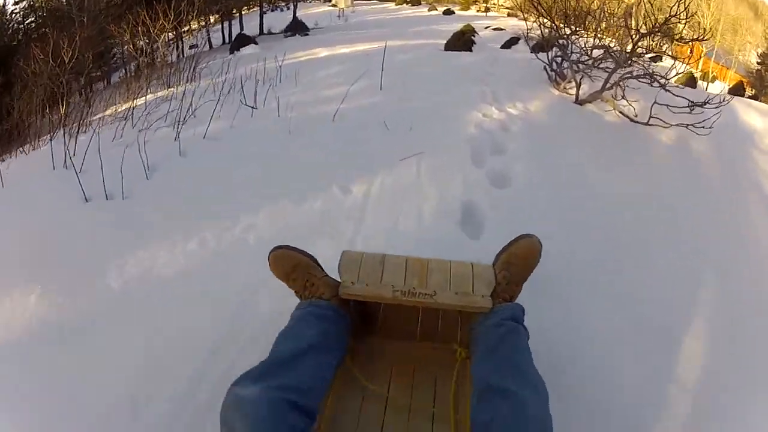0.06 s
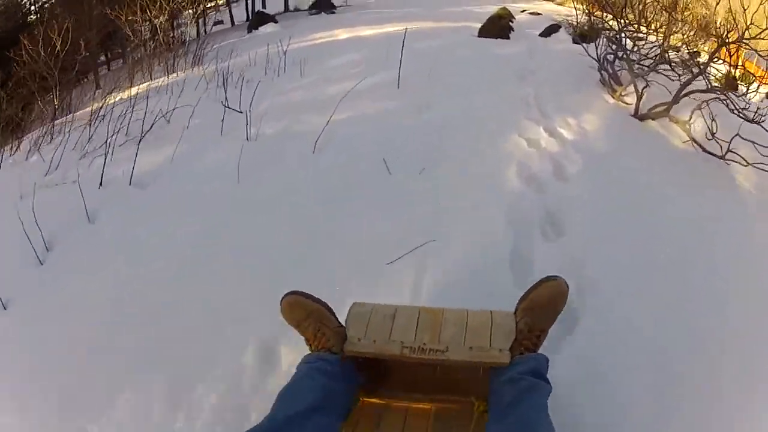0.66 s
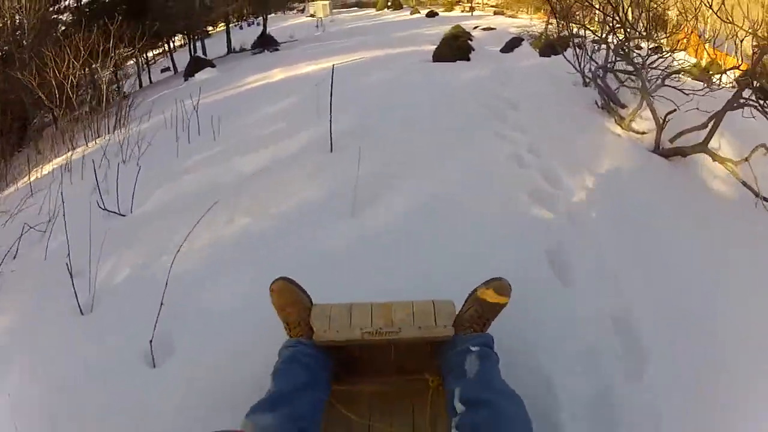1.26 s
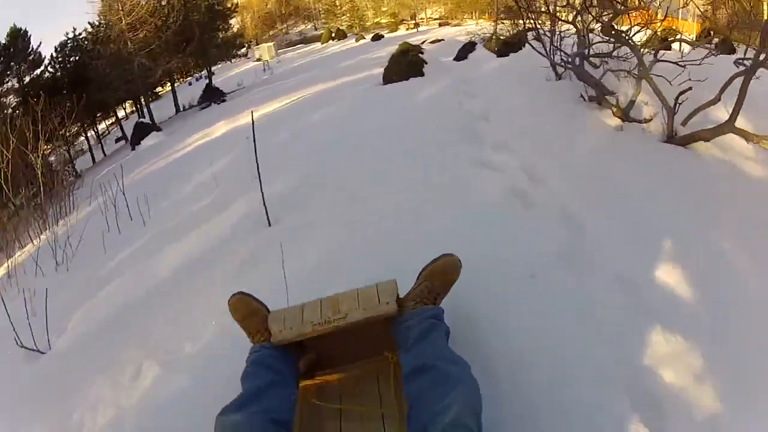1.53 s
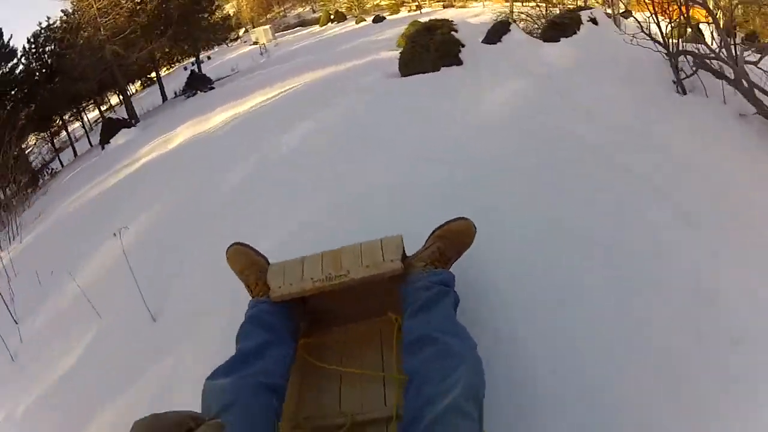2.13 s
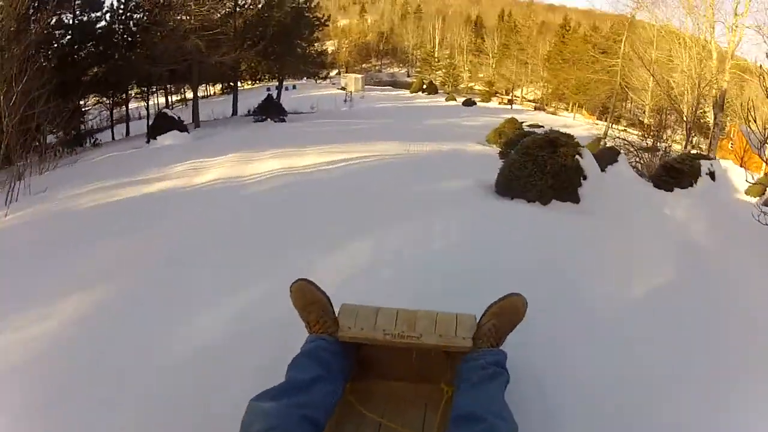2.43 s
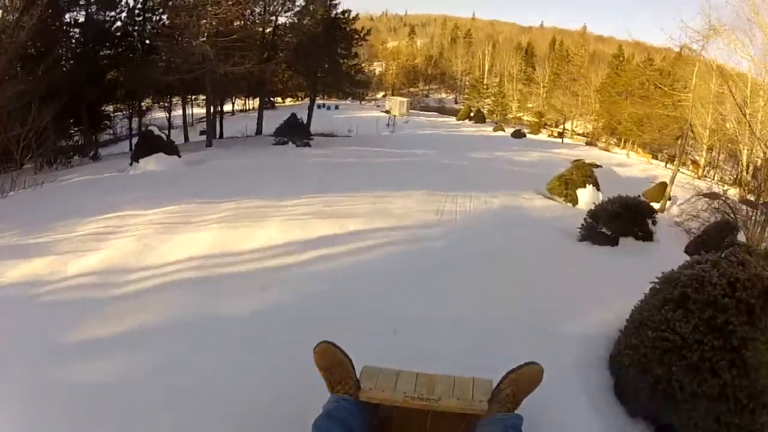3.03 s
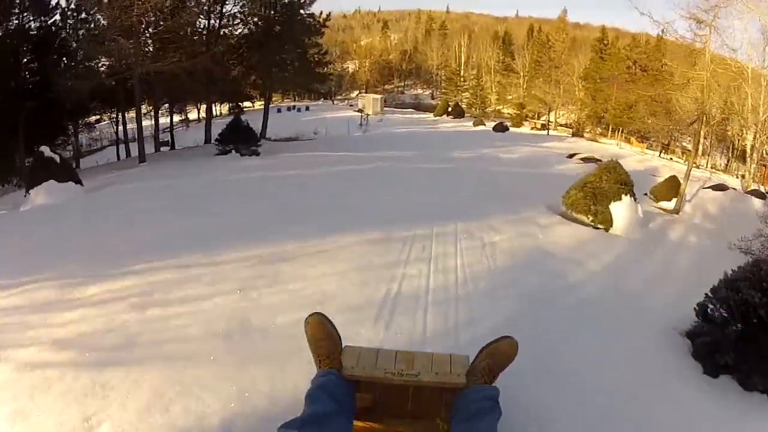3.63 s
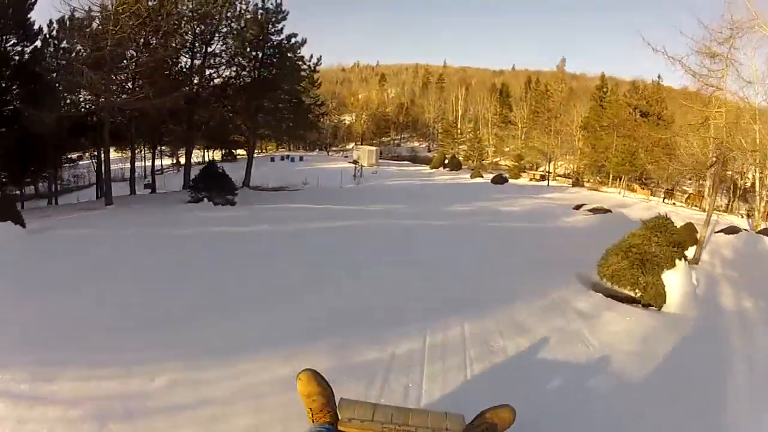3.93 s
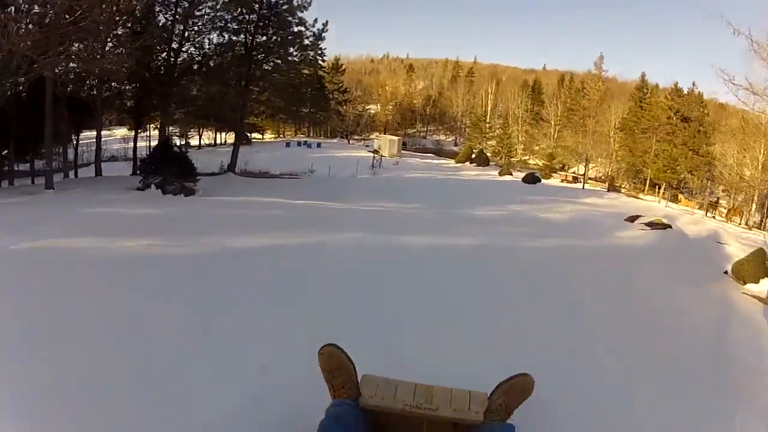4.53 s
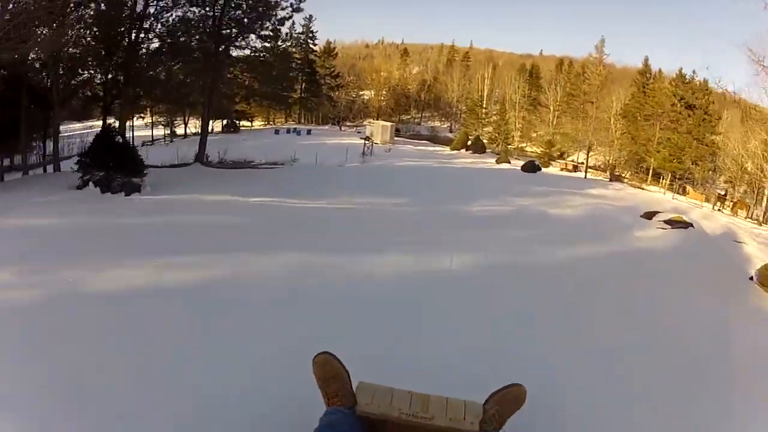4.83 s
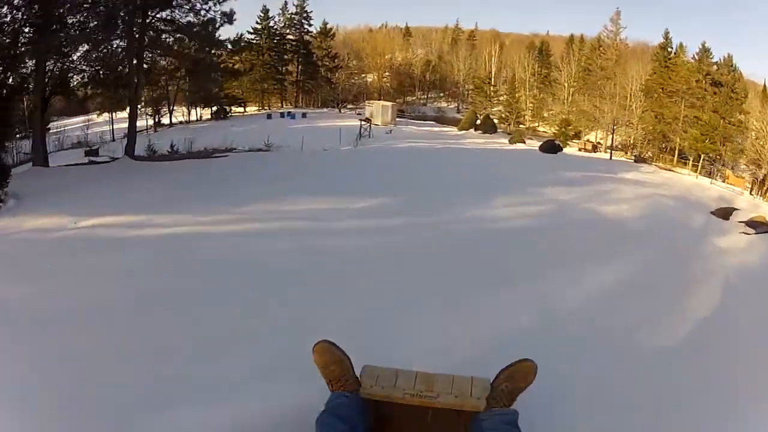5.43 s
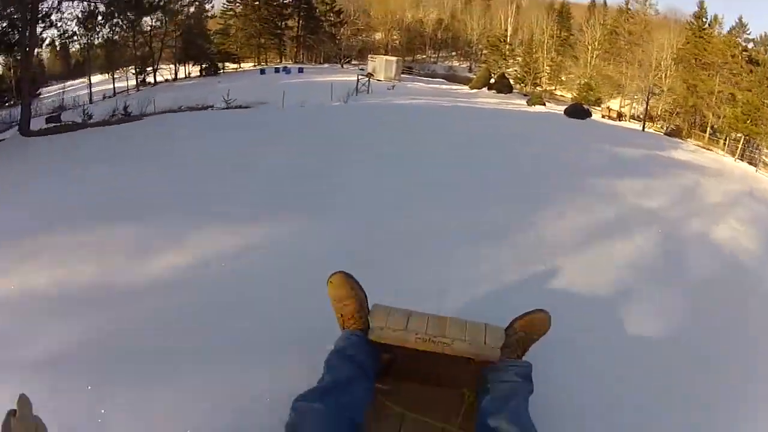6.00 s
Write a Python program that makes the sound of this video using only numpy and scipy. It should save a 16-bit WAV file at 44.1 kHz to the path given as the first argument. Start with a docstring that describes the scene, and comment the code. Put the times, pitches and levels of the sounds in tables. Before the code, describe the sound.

Gritty hiss of a toboggan sliding down icy snow, broken by irregular camera case clicks, thumps and wind rumble.

```python
"""A wooden toboggan scrapes down crusted snow, its boards crushing grains as it gathers speed.
Crust breaks, gear rubs and lumps drum on the boards. Heard from a cased camera worn by the rider:
wind and bumps shake the case, and it clacks in its mount. The recorder overloads on peaks and
holds each sample of a low rate, mirroring the sound into a gritty treble."""
import sys
import numpy as np
from scipy import signal
from scipy.fft import rfft, irfft, next_fast_len
from scipy.io import wavfile

SR = 44100
rng = np.random.default_rng(int(sys.argv[2]) if len(sys.argv) > 2 else 0)


def bounce(signal):
    """Save signal as a 16-bit WAV file at the path given by the first command-line argument."""
    frames = np.transpose(np.atleast_2d(signal))
    limited = np.clip(frames, -1, 1)
    pcm = np.round(limited * 32767).astype(np.int16)
    wavfile.write(sys.argv[1], SR, pcm)


N = 276066
TIME_S = np.arange(N) / SR

# Air past the case. Each row: time in seconds, level in dB.
AIRFLOW = [(0.0, -46), (0.75, -39), (1.0, -45), (1.3, -44), (2.6, -45), (3.4, -40), (4.2, -40.5),
           (4.45, -33.5), (5.1, -36.5), (5.5, -39.5), (6.26, -32.5)]
# Buffeting spectrum. Each row: frequency in Hz, relative level in dB.
WIND_SPECTRUM = [(8.2, -44), (14, 7.5), (59, 1), (71, -6.5), (92, -15), (130, -28), (170, -72), (290, -120)]
# Bumps of the slope. Each row: start in seconds, envelope peak in dB.
BUMPS = [(0.216, -28), (0.272, -26.5), (0.345, -27), (0.537, -32.5), (0.661, -28.5), (2.435, -29),
         (2.911, -30), (3.491, -26), (3.729, -30), (3.805, -31), (4.341, -29.5), (4.6, -23.5), (4.752, -27),
         (5.226, -26), (5.298, -24.5), (5.364, -18), (5.40, -28), (5.619, -30), (5.91, -29), (5.97, -28),
         (6.186, -21)]
# Lumpy stretches. Each row: middle in seconds, rumble rise in dB, length in seconds.
LUMPS = [(0.04, 4, .06), (0.23, 6, 0.065), (0.855, 6.5, 0.094), (1.15, 2.5, 0.22)]
# Board rumble spectrum. Each row: frequency in Hz, relative level in dB.
RUMBLE_SPECTRUM = [(53, -42), (90, -32), (146, -7.5), (284, -5.5), (456, -11), (546, -16), (700, -17),
                   (910, -6), (1540, -120)]
# Blows of the case on its mount. Each row: start in seconds, force in dB.
CLACKS = [(0.2329, 2.5), (0.3328, -14.5), (0.381, -27.5), (0.595, -4), (0.7237, -18), (1.8419, -26),
          (2.1026, -13), (2.8681, -3.5), (2.9601, -16), (3.0914, -19.5), (3.2853, -25), (3.7472, -14.5),
          (4.0711, -7.5), (4.2685, -5.5), (4.3318, -17), (4.6373, -14.5), (4.7355, -20.5), (4.9568, -9.5),
          (5.1395, -4), (5.2479, -14.5), (5.3735, -5), (5.6445, -3.5), (5.7946, -22), (5.8421, -22),
          (6.0328, -6.5), (6.2176, -5)]
# Ring of the case. Each row: frequency in Hz, relative level in dB, T60 in seconds.
CASE_MODES = [(326, -25.5, 0.016), (830, -25.5, 0.04), (909, -24, 0.033), (1246, -23, 0.036),
              (1538, -14, 0.047), (1762, -20.5, 0.033), (1923, -23, 0.032), (2256, -13, 0.02),
              (2630, -15, 0.0093), (3510, -10.5, 0.0083)]
# Hollow case resonances. Each row: centre in Hz, width in Hz, gain in dB.
CASE_HOLLOWS = [(910, 284, 7.5), (1487, 48, 3.5), (1742, 116, 4), (2160, 94, 4.5), (2420, 320, 4.5),
                (2623, 240, 4), (3327, 123, -8.5), (3458, 104, 6), (3860, 110, 6), (4310, 700, -2.5),
                (4890, 180, 5.5), (5307, 220, 7.5)]
# Crust breaks and gear rubs. Each row: middle in seconds, level in dB, length in seconds,
# centre in Hz, width in octaves.
CRUNCHES = [(0.095, -41.5, 0.16, 2160, 0.11), (0.215, -32, 0.012, 2650, 0.59),
            (0.324, -34, 0.0028, 5200, .4), (0.373, -40, 0.004, 5200, .4), (0.515, -46.5, 0.013, 5200, .4),
            (0.561, -40, 0.011, 5150, .4), (0.632, -33, 0.0088, 2200, 2.4),
            (0.665, -23, 0.0061, 1710, 0.42), (0.8, -31, 0.015, 2800, 0.33),
            (0.876, -24, 0.0065, 1710, 0.4), (0.883, -24.5, 0.0017, 3950, 0.28),
            (1.215, -35, 0.054, 2730, 0.11), (1.911, -35, 0.024, 1490, 0.3),
            (1.971, -31.5, 0.024, 1660, .5), (2.243, -24, 0.0078, 2500, 0.49), (4.564, -35, 0.03, 3300, .5),
            (5.096, -33, 0.0089, 1880, 0.65)]
# How hard the boards bear on the snow. Each row: time in seconds, contact level in dB.
CONTACT = [(0, -40.5), (0.22, -41), (0.52, -41.5), (0.72, -42.5), (0.95, -36.9), (2.6, -39.0), (3.03, -40),
           (3.3, -36.5), (3.9, -39.5), (5.0, -38), (5.5, -38), (6.26, -34.5)]
# Snow ridges. Each row: middle in seconds, contact rise in dB, length in seconds.
RIDGES = [(0.65, 5, 0.055), (0.82, 6, 0.067), (0.89, 6, 0.013), (1.22, 2, 0.027), (1.5, 3, 0.037),
          (1.75, 3.5, 0.049), (2.02, 3, 0.051), (2.25, 5.5, .069), (2.45, 5, .16), (2.76, 3.5, 0.24),
          (3.38, 3.5, 0.047), (3.55, 2, 0.041), (3.71, 2.5, 0.18), (4.01, 5.5, .05), (4.14, 4, 0.17),
          (4.47, 5.5, 0.031), (4.57, 4, 0.087), (4.7, 4.5, 0.026), (5.1, 4, .065), (5.18, 5, 0.019),
          (5.28, 4.5, 0.15), (5.61, 4.5, 0.055), (5.9, 5, 0.047), (6.02, 2.5, 0.09)]
# Icy (+) and soft (-) snow. Each row: middle in seconds, tilt in dB per octave, length in seconds.
SNOW_PATCHES = [(0.05, 3.5, .12), (0.68, -1, 0.21), (1.55, 1.5, .3), (1.93, -2.5, 0.11), (2.53, -2, 0.11),
                (3.42, 1, 0.12), (3.8, -3, .16), (4.12, 0.5, .2), (5.53, -3.5, 0.099)]
# Crushed snow spectrum. Each row: frequency in Hz, relative level in dB.
SCRAPE_SPECTRUM = [(260, -13.5), (450, -14), (624, -19), (932, -11), (1310, -14.5), (1720, 1), (2140, 2),
                   (2360, -7), (2620, 1.5), (3560, -0.5), (4170, -10.5), (4930, -6.5), (5600, -9),
                   (7280, -22), (12300, -120)]


def from_db(db):
    """Decibels to gain."""
    return 10 ** (np.asarray(db) / 20)


def unit_rms(x):
    """Scale to rms 1."""
    return x / np.sqrt(np.mean(x ** 2) + 1e-20)


def curve(rows):
    """Interpolate (seconds, value) rows at every sample."""
    return np.interp(TIME_S, *np.transpose(rows))


def bell(t, sigma_s):
    """Gaussian of height 1 at time zero."""
    return np.exp(-np.minimum((t / sigma_s) ** 2 / 2, 50))


def swells(rows):
    """Sum of bells, one per row."""
    return sum(height * bell(TIME_S - mid_s, length_s / 2) for mid_s, height, length_s in rows)


def add(out, start_s, sound):
    """Mix a short sound in."""
    start = max(round(start_s * SR), 0)
    out[start:start + len(sound)] += sound[:max(N - start, 0)]


def drift(rate_hz):
    """Slow random wander, rms 1."""
    step, warmup = 40, 2000
    pole = np.exp(-2 * np.pi * rate_hz * step / SR)
    noise = rng.standard_normal(N // step + warmup + 2)
    slow = signal.lfilter([1], [1, -2 * pole, pole * pole], noise)[warmup:]
    return np.interp(np.arange(N) / step, np.arange(len(slow)), unit_rms(slow))


def colour(x, spectrum, resonances=()):
    """Shape by a spectrum and resonances; rms 1."""
    size = next_fast_len(N)
    hz = np.maximum(np.fft.rfftfreq(size, 1 / SR), 1)
    points_hz, points_db = np.transpose(spectrum)
    db = np.interp(np.log(hz), np.log(points_hz), points_db)
    for centre_hz, width_hz, peak_db in resonances:
        db += peak_db / (1 + (2 * (hz - centre_hz) / width_hz) ** 2)
    return unit_rms(irfft(rfft(x, size) * from_db(db), size)[:N])


def band(x, low_hz, high_hz):
    """Gentle band-pass; rms 1."""
    sos = signal.butter(2, [low_hz, high_hz], "band", fs=SR, output="sos")
    return unit_rms(signal.sosfilt(sos, x))


def lowpass(x, edge_hz, order):
    """Zero-phase low-pass."""
    return signal.sosfiltfilt(signal.butter(order, edge_hz, fs=SR, output="sos"), x)


def grains(per_s, spread_db):
    """Snow crystals snap at random times with uneven strength; rms 1."""
    sizes = from_db(spread_db * np.minimum(rng.exponential(1, N), 4))
    signs = rng.choice([-1, 1], N)
    snaps = rng.random(N) < per_s / SR
    return unit_rms(sizes * signs * snaps)


def wind(gust_db=3.5, flare_db=-9.5, flare_s=0.023):
    """Air buffets the case in short low gusts and flares after each bump."""
    envelope = from_db(curve(AIRFLOW) + gust_db * drift(12.7))
    for start_s, bump_db in BUMPS:
        age = np.maximum(TIME_S - start_s, 0) / flare_s
        flare = from_db(bump_db + flare_db) * age * np.exp(1 - age)
        envelope = np.hypot(envelope, flare)
    return envelope * colour(rng.standard_normal(N), WIND_SPECTRUM)


def bumps(shake_hz=54, rise_s=0.011):
    """Each bump shakes rider and case for a few slow cycles."""
    t, out = np.arange(SR // 4) / SR, np.zeros(N)
    shake = t / rise_s * np.exp(1 - t / rise_s) * np.sin(2 * np.pi * shake_hz * t)
    for start_s, peak_db in BUMPS:
        add(out, start_s, from_db(peak_db) * shake)
    return out


def board_rumble(contact_db, base_db=-53.5, contact_share=0.66, judder_db=2.5):
    """Snow lumps drum dully on the loaded boards, louder under harder contact."""
    level_db = base_db + contact_share * (contact_db - contact_db.mean()) + swells(LUMPS)
    envelope = from_db(level_db + judder_db * drift(27))
    return envelope * colour(grains(per_s=4000, spread_db=2.5), RUMBLE_SPECTRUM)


def case_clacks(snap_hz=1735, snap_s=0.00067, rise_s=0.00089, rebound_s=0.0119, rattle_t60_s=0.068):
    """The case hits its stop: a snap and dry crackle, a brief ring, then a light rebound."""
    lead_s = 5 * snap_s
    t, out = np.arange(SR // 10) / SR - lead_s, np.zeros(N)
    age_s = np.maximum(t, 0)
    mode_hz, mode_db, mode_t60_s = np.transpose(CASE_MODES)[:, :, None]
    for start_s, force_db in CLACKS:
        force = from_db(force_db)
        stretch = 1 + 0.13 * force ** 3  # hard blows press in longer
        press = bell(t, snap_s * stretch)
        buildup = np.cumsum(press) / press.sum()
        # Pressing in stiffens the contact: pitch rises.
        advance_s = 0.036 * force ** 2 * snap_s * np.logaddexp(0, 2 * t / snap_s)
        detune = 1 + 0.0086 * rng.normal()
        tone = np.cos(2 * np.pi * snap_hz * detune * (t + advance_s))
        rebound_gain = from_db(-25) * rng.uniform(0, 2)
        rebound = rebound_gain * bell(t - rebound_s * (1 + 0.06 * rng.normal()), snap_s)
        snap = (press + rebound) * tone
        mode_gains = from_db(mode_db + 2 * rng.standard_normal(mode_hz.shape) - 60 * age_s / mode_t60_s)
        modes = np.sum(mode_gains * np.cos(2 * np.pi * mode_hz * t), axis=0)
        ring = buildup * modes / stretch ** 2  # long contact damps the ring
        tick_noise = band(rng.standard_normal(len(t)), low_hz=2600, high_hz=5600)
        tick = from_db(-22) * bell(t - 0.00056, sigma_s=0.0022) * tick_noise
        rattle_noise = band(rng.standard_normal(len(t)), low_hz=1400, high_hz=2200)
        rattle = buildup * from_db(-29 - 60 * age_s / rattle_t60_s) * rattle_noise
        thump = from_db(-15) * force ** 2 * bell(t, snap_s)  # low overload thump on the hardest clacks
        add(out, start_s + rise_s * stretch - lead_s, force * (snap + ring + tick + rattle + thump))
    return out


def crunches():
    """Crust breaks and gear rubs: short swells of coarse grains, each in its own band."""
    coarse = colour(grains(per_s=7000, spread_db=5.0), SCRAPE_SPECTRUM, CASE_HOLLOWS)
    out = np.zeros(N)
    for mid_s, level_db, length_s, centre_hz, width_oct in CRUNCHES:
        edge_ratio = 2 ** (width_oct / 2)
        envelope = from_db(level_db) * bell(TIME_S - mid_s, length_s / 2)
        out += envelope * band(coarse, centre_hz / edge_ratio, centre_hz * edge_ratio)
    return out


def sled_speed_db(start_share=0.34, time_constant_s=3.3):
    """Speed relative to top speed: gravity pulls the sled on until friction balances it."""
    return 20 * np.log10(1 - (1 - start_share) * np.exp(-TIME_S / time_constant_s))


def board_scrape(contact_db, grains_per_s=11000, gain_db=1.0, judder_db=1.13, flicker_db=0.78):
    """The boards crush grains: harder contact breaks more, speed and icy snow brighten them."""
    tilt_db_per_oct = 2.04 + 0.67 * sled_speed_db() + swells(SNOW_PATCHES)
    snaps_per_s = grains_per_s * from_db(contact_db - contact_db.mean())
    remaining = colour(grains(snaps_per_s, spread_db=2.0), SCRAPE_SPECTRUM, CASE_HOLLOWS)
    out = np.zeros(N)
    for edge_hz in (1250, 2100, 3100, 4400, 7000):
        part = lowpass(remaining, edge_hz, order=4)
        remaining = remaining - part
        height_oct = max(np.log2(edge_hz / 2400), 0) - 0.5  # lowest two bands move together
        out += part * from_db(tilt_db_per_oct * height_oct + flicker_db * drift(18))
    return out * from_db(contact_db + gain_db + judder_db * drift(30))


def scene():
    """One microphone inside the case; open snow gives no echo."""
    contact_db = curve(CONTACT) + swells(RIDGES)
    snow = board_scrape(contact_db) + crunches()
    case = case_clacks() + bumps() + wind()
    return (snow + case + board_rumble(contact_db))[None]


def record(dry, positive_limit=0.77, negative_limit=0.61, top_hz=5950, hold_hz=12000, cutoff_hz=15300):
    """Peaks clip lopsidedly; sample-and-hold mirrors the sound around the hold rate."""
    limit = np.where(dry > 0, positive_limit, negative_limit)
    clipped = dry / (1 + (dry / limit) ** 12) ** (1 / 12)
    slow = signal.resample_poly(lowpass(clipped, top_hz, order=10), hold_hz, SR, axis=1)
    held = np.repeat(slow, 4, axis=1)
    gritty = signal.resample_poly(held, SR, 4 * hold_hz, axis=1)[:, :N]
    return signal.sosfilt(signal.ellip(10, 0.2, 90, cutoff_hz, fs=SR, output="sos"), gritty)


dry = scene()
out = record(dry)
bounce(out)
```